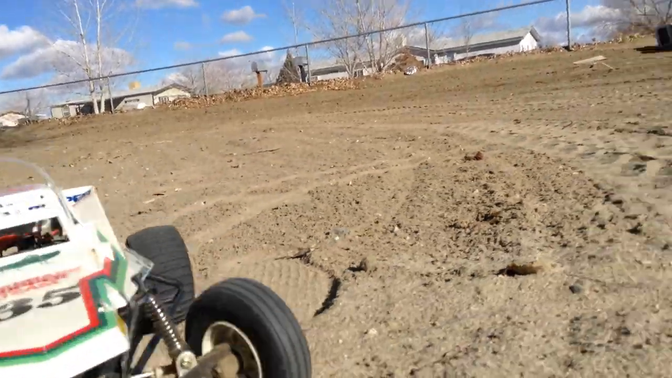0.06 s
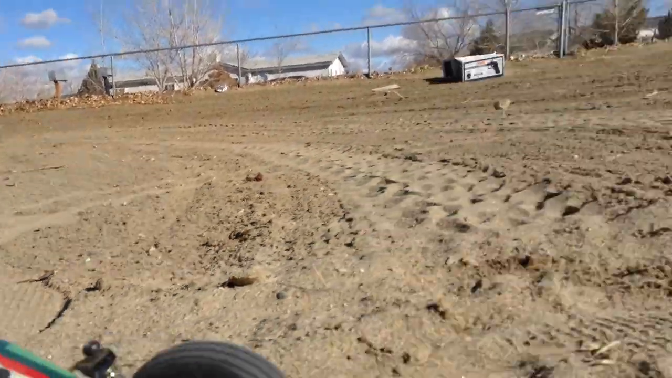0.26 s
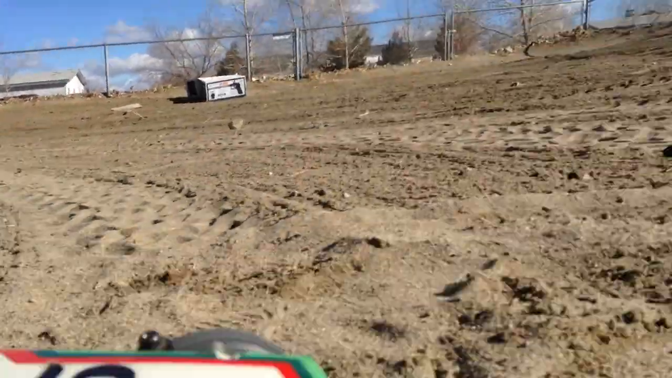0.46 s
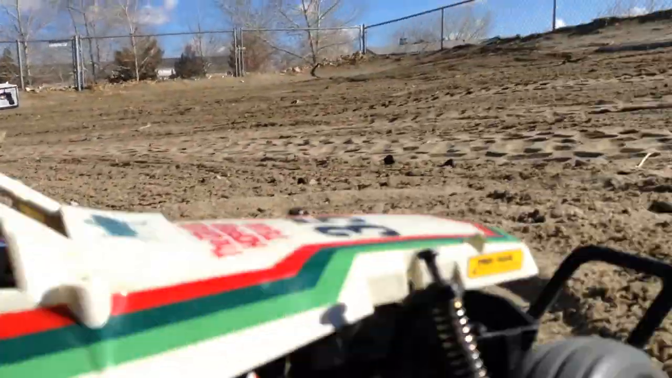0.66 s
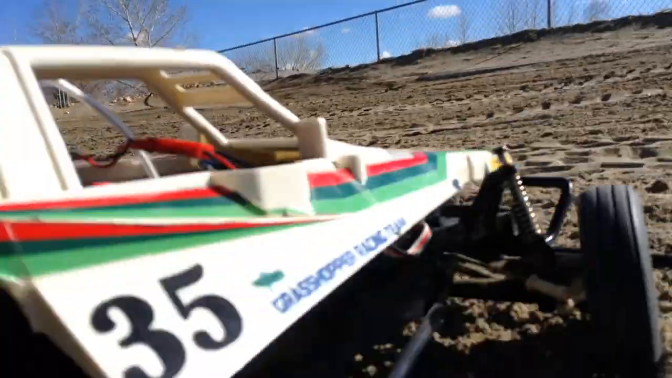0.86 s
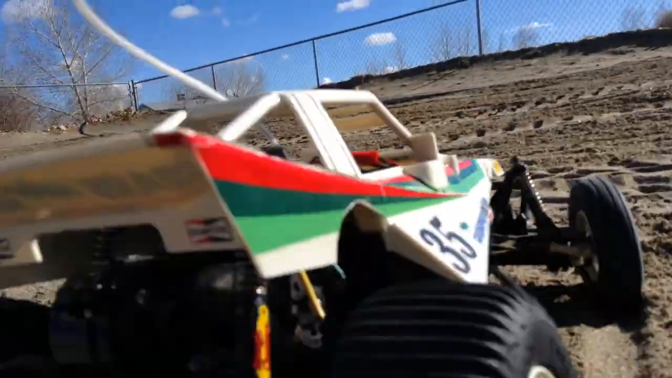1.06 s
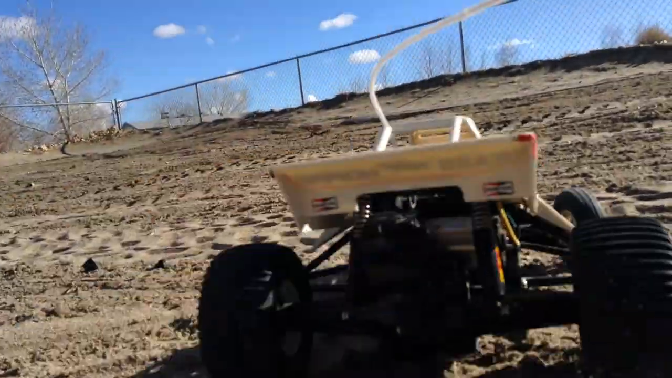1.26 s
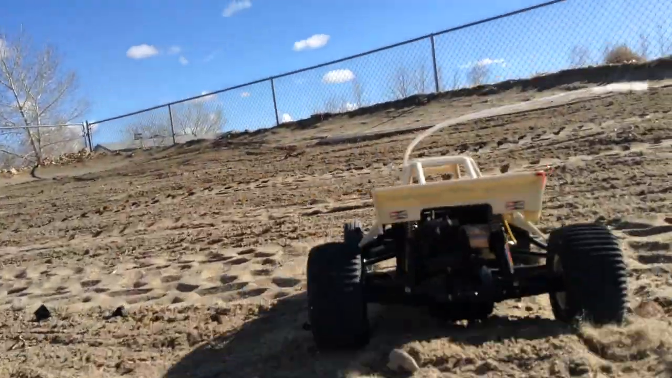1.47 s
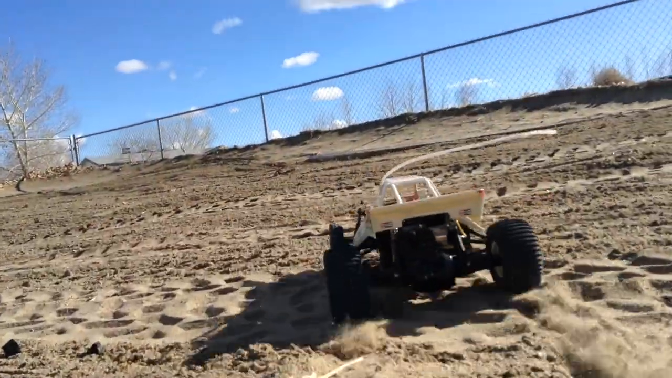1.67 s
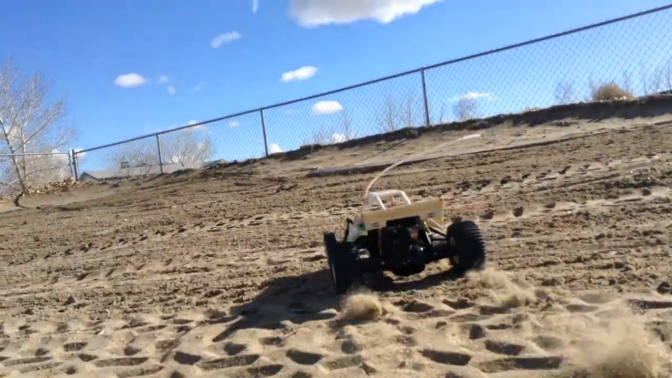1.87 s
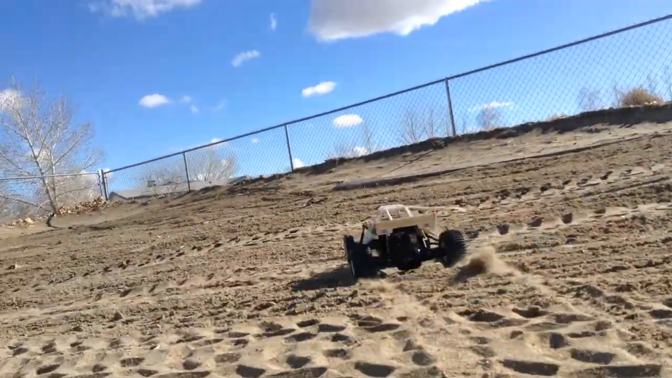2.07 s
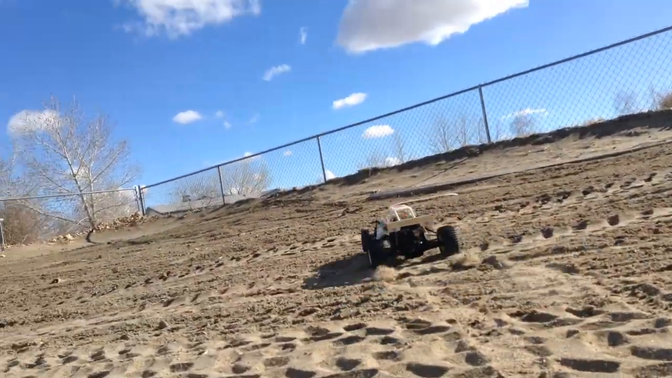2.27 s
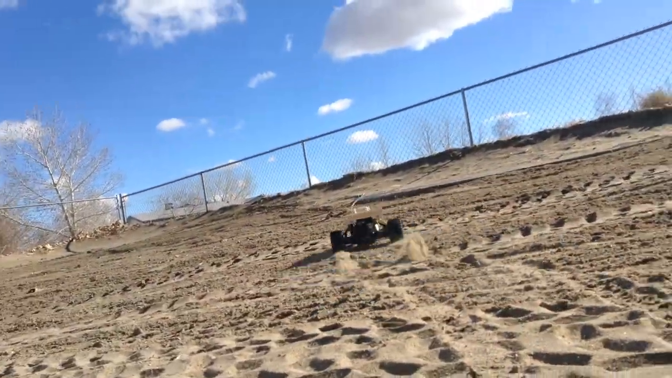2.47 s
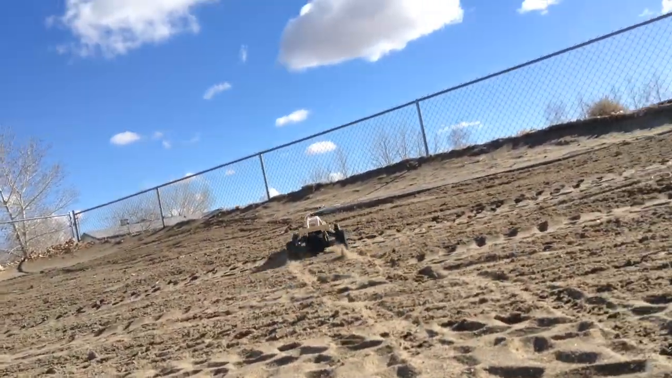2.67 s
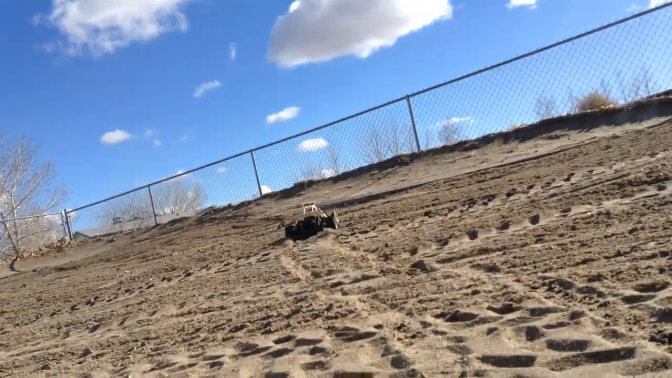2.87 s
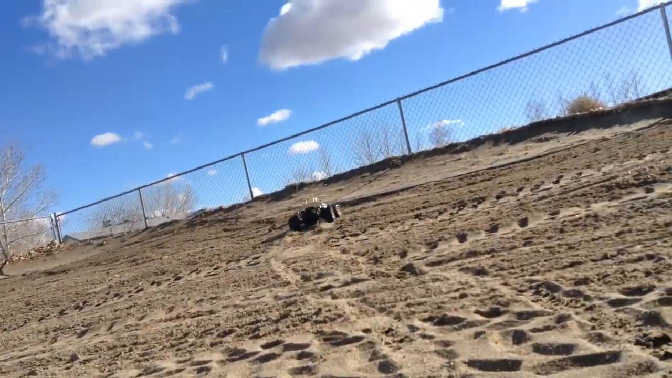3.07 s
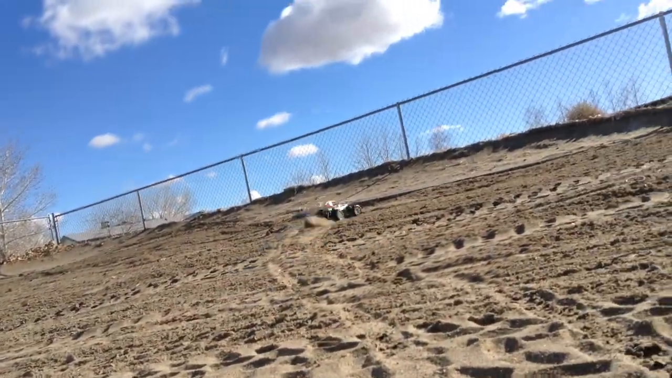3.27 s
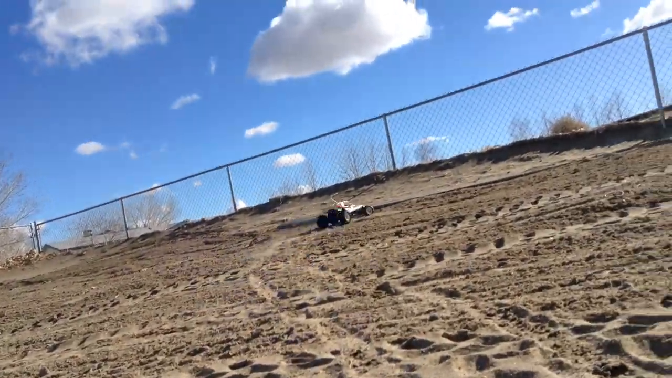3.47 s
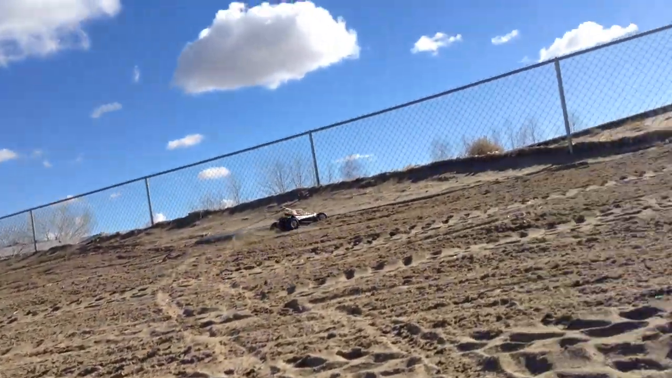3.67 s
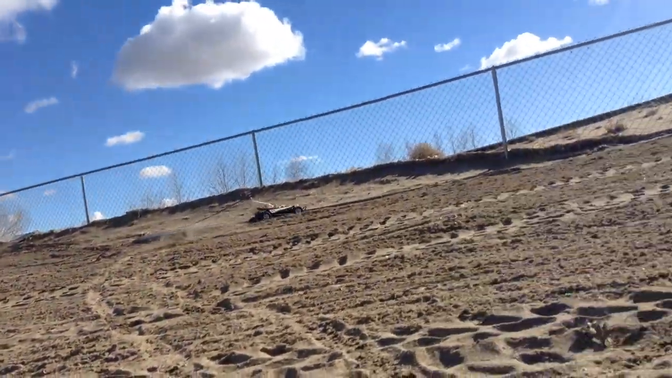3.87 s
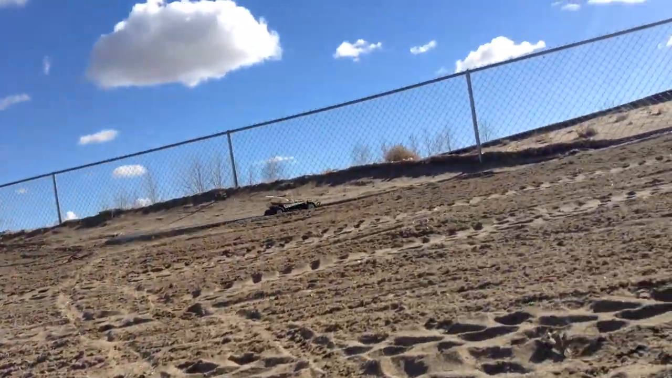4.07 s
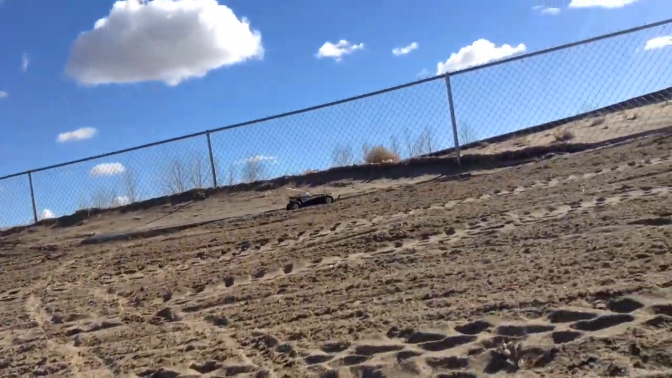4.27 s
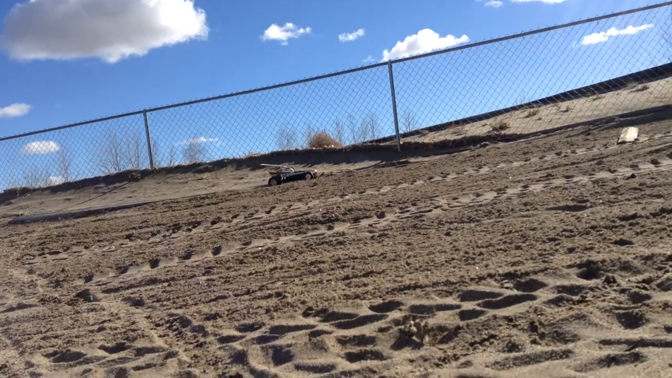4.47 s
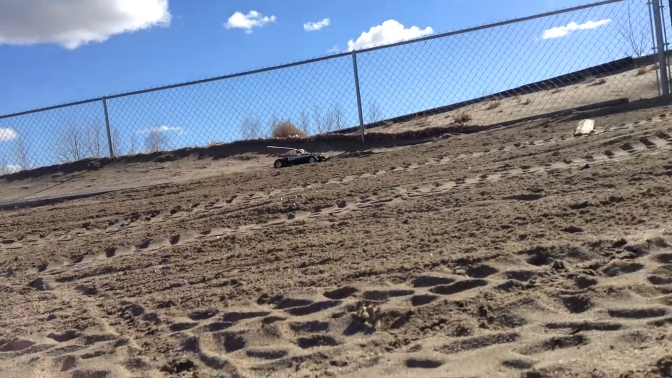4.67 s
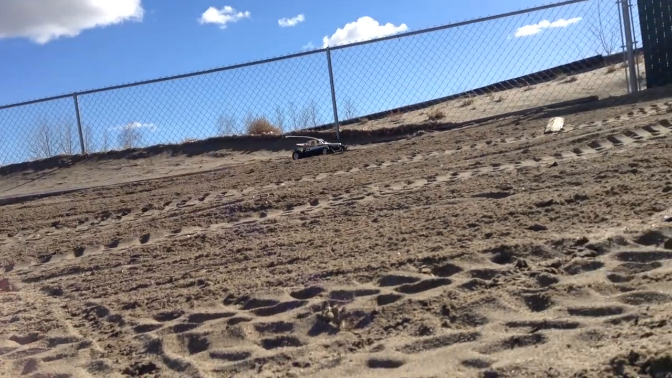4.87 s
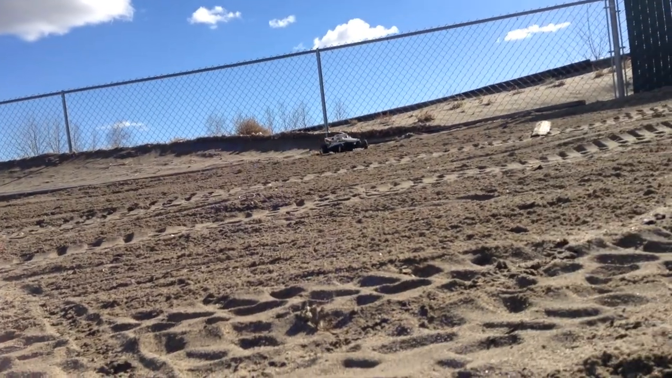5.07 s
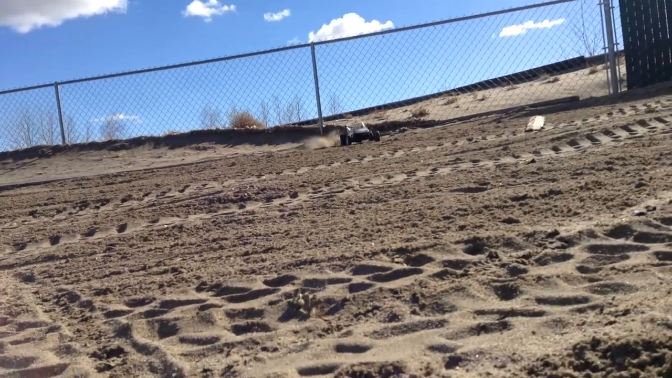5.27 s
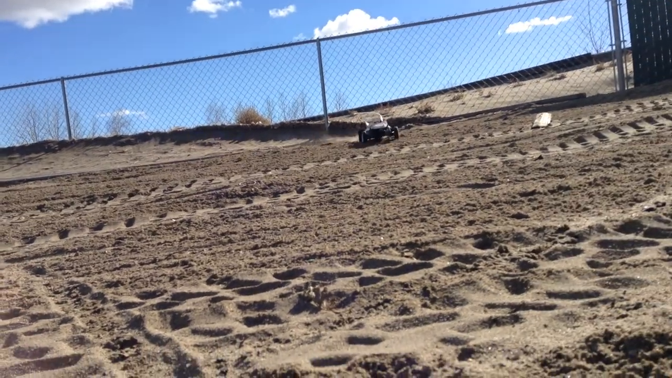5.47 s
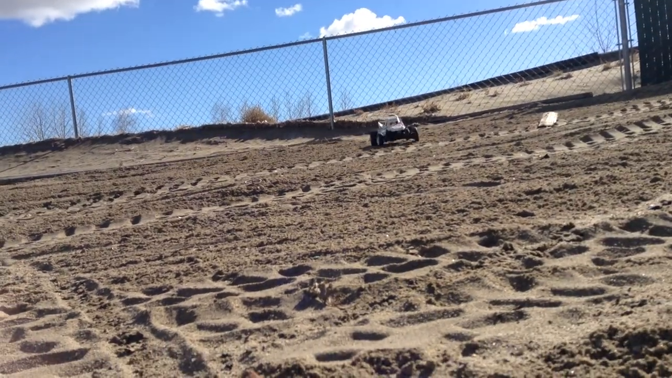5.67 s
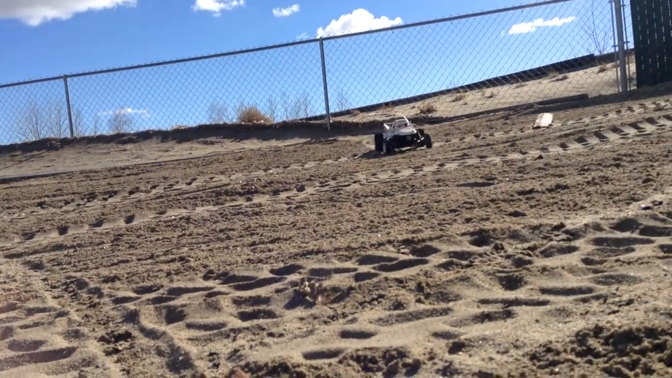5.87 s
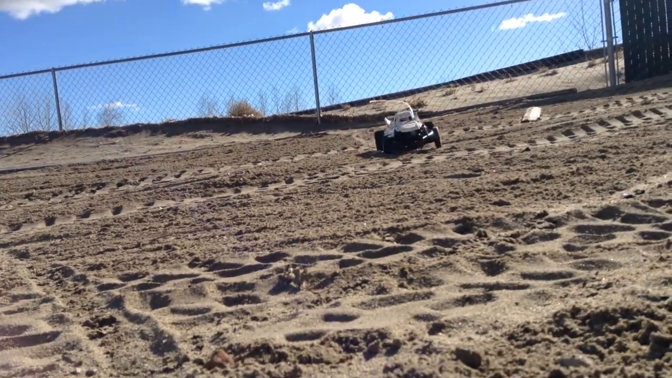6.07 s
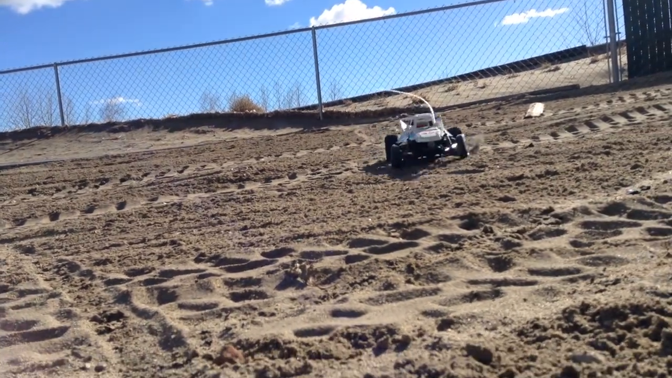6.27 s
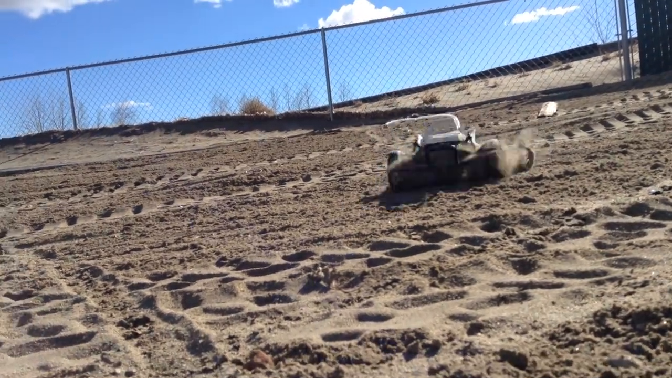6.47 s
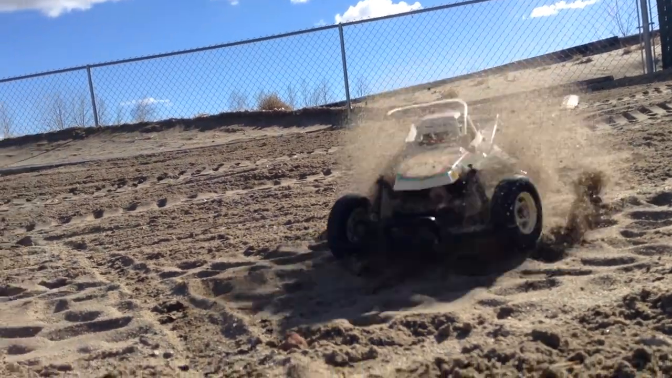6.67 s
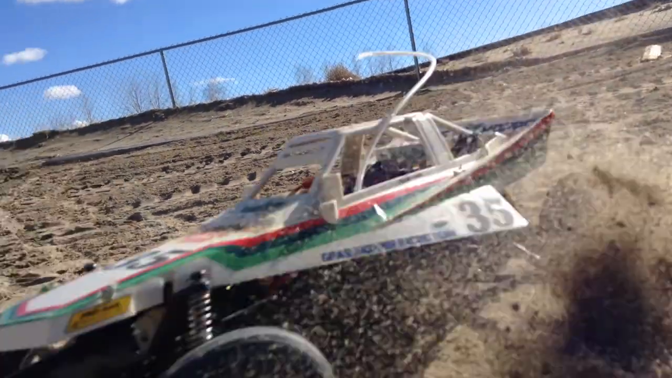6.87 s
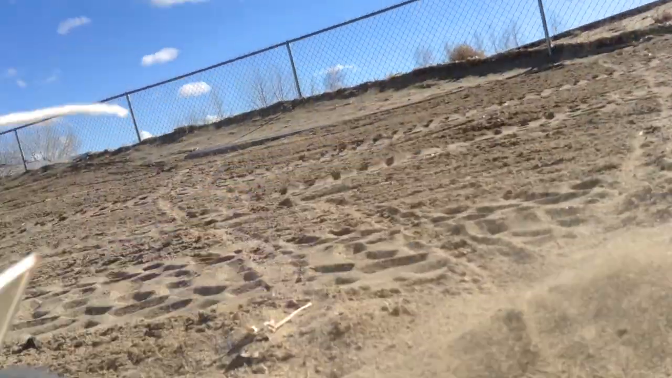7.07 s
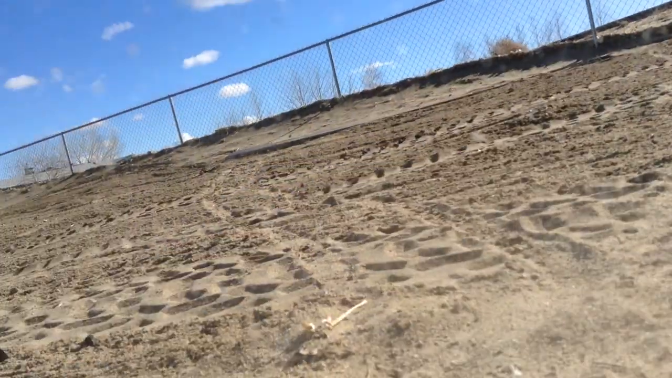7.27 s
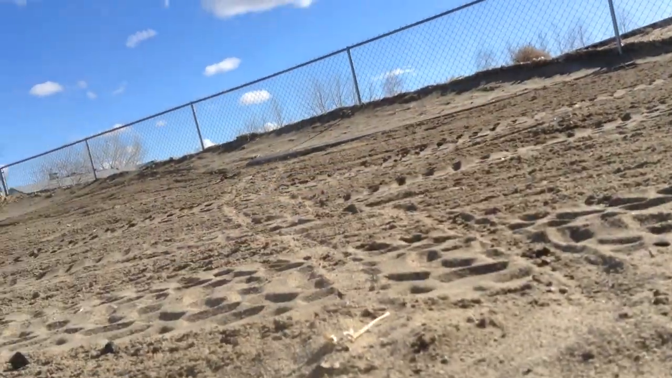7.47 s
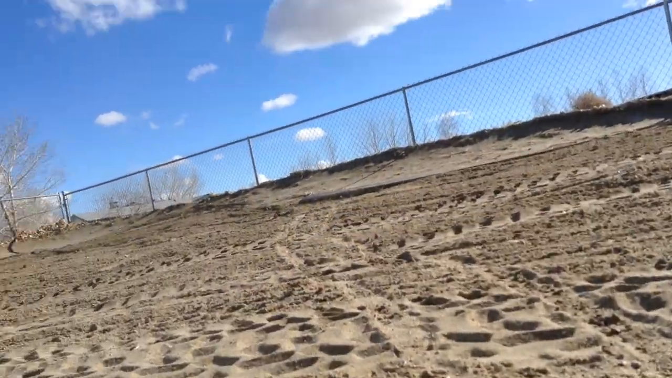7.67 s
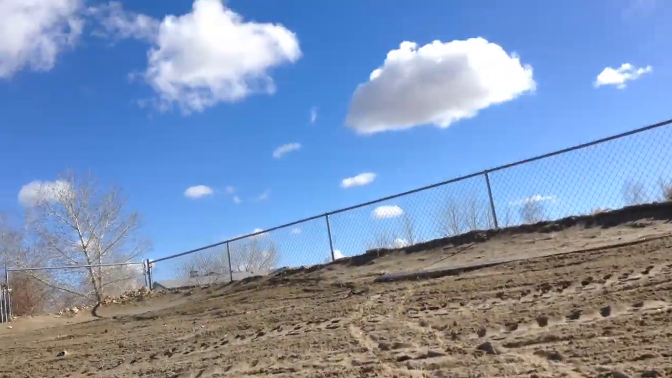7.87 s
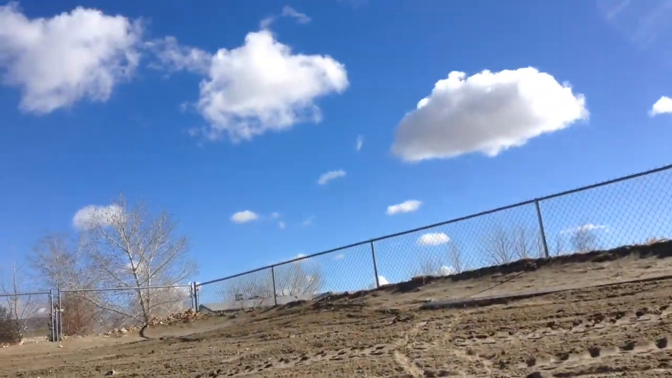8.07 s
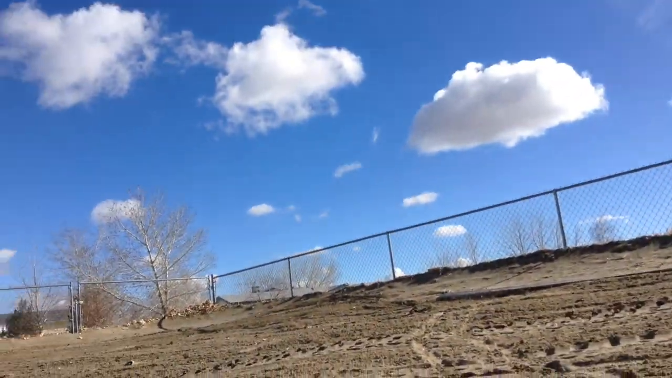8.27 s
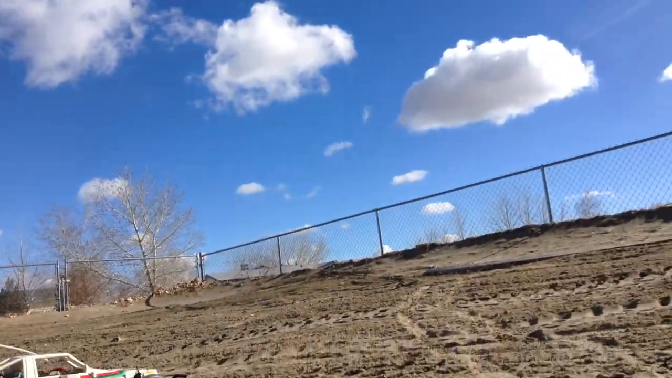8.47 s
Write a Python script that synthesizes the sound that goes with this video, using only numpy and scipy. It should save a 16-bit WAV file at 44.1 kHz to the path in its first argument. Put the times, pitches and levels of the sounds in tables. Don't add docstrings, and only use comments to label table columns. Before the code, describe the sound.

Open dirt ground, dry outdoor sound, small handheld microphone. From the start a toy electric buggy's plastic gears whine at medium level, rough and warbling as ruts and hops jerk its speed, with bright gritty hiss. It swells around 0.8-1.8 s in an uneven close pass, with hard little knocks near 1.05 and 1.6 and dull hollow thumps. At about 1.6 the pitch leaps up and the buggy drives off, fading steadily to 3 s. From 3.5 to about 5.8 it is a thin, faint, fluttering treble whirr, over barely audible wind and far traffic. It grows again from 6, rising in pitch, and bursts past loudest around 6.8-7.2, with a lumpy sand-skid roar, rattling clicks and thumps. By 7.75 it has dropped in level and pitch, and it whines on, rough and moderate, to the end at 8.5.

```python
import sys
import numpy as np
from scipy import signal
from scipy.fft import rfft, irfft
from scipy.io import wavfile
from scipy.ndimage import uniform_filter1d

SR = 44100
rng = np.random.default_rng(int(sys.argv[2]) if len(sys.argv) > 2 else 0)


def unload_wav(signal):
    wavfile.write(
        sys.argv[1],
        SR,
        np.round(np.clip(np.atleast_2d(signal).T, -1, 1) * 32767).astype(np.int16),
    )


def level_to_linear(level):
    exponent = np.asarray(level, float) / 20
    return 10 ** exponent


N = 375732
TIME_S = np.arange(N) / SR

# [t/s, f/Hz]
MESH_RATE = [(0.0, 864.3), (0.3, 874.5), (0.85, 740.3), (1.03, 743.1), (1.14, 904.6), (1.35, 1082),
             (1.52, 1078), (1.6, 1585), (2.0, 1703), (2.6, 1730), (3.3, 1892), (4.2, 1845), (5.2, 1764),
             (5.8, 1773), (6.5, 1980), (7.3, 2138), (7.8, 1679), (8.52, 1495)]
# [t/s, gearbox level/dB, share turned away/0-1, sand spray level/dB]
DRIVE = [(0.0, -29, 0, -18.5), (0.9, -20, 0.04, -12.5), (1.04, -22.5, 0, -14), (1.2, -13.5, 0.77, -18.5),
         (1.45, -21, 0.59, -9.5), (1.7, -13, 0.95, -11.5), (2.25, -24, 0.95, -7.5), (3.14, -30, 1.1, -6.5),
         (3.46, -38, .8, -9), (3.62, -34, 1, -6), (3.89, -38.5, 0.88, -3), (3.915, -44, 0.55, -12),
         (4.9, -41.5, 1, -13.5), (5.84, -40.5, 0.58, -6), (6.56, -26.5, 0.51, -11.5),
         (7.08, -10, 0.78, -14), (7.75, -26.5, 0.52, -13.5), (8.52, -29.5, 0.77, -15)]
# [t/s, whine above hiss level/dB, housing song level/dB]
GEAR_LOAD = [(0, -5.5, -4.5), (.85, -1, 0.5), (1.15, -2.5, 3.5), (1.5, -0.5, 7), (1.65, -0.5, 0),
             (3.4, 0, -2), (4.5, -1.5, -2.5), (5.8, 1.5, -5.5), (6.5, -1.5, -5), (7.5, -3, -1.5),
             (8.52, 1.5, -2)]
# [t/s, strength/1]
BACKLASH = [(0, .8), (.85, .6), (.92, .35), (1.5, .45), (1.65, .7), (3.4, .9), (3.55, 1.2), (4.5, 1),
            (5.8, 1), (6.4, 1.6), (7.5, 1.2), (8.15, 1.1), (8.3, .8), (8.52, .7)]
# [f/Hz, level/dB]
HOUSING_GAIN = [(150, -48), (550, -20), (850, -18.5), (1150, -20.5), (1400, -14), (1800, -6.5),
                (2250, -8.5), (2600, -13.5), (3200, -20.5), (4500, -8.5), (5700, -2), (6500, -0.5),
                (8000, -15), (15500, -33.5)]
SHAFT_DB = [-4, -11]
# [t/s, speed loss/%]
RUTS = [(0.012, 16.7), (0.166, 20), (0.361, 20), (0.519, 13.1), (0.934, 12.2), (0.967, 6), (1.034, 25.2),
        (1.253, 16.4), (1.918, 11.3), (2.063, 9.6), (2.79, 15.3), (2.875, 14.3), (3.937, 9.3),
        (4.326, 16.9), (4.416, 22), (4.532, 12), (4.783, 10.3), (5.168, 9.5), (5.613, 18.3), (5.831, 21.3),
        (6.048, 15.7), (6.114, 9), (6.609, 17), (6.956, 13.7), (7.222, 18.7), (7.256, 8.6), (7.379, 11),
        (7.818, 11.6), (7.944, 9.2), (8.233, 16)]
# [t/s, speed gain/%]
HOPS = [(0.112, 8), (0.263, 22.2), (0.461, 8.4), (0.784, 37), (0.81, 13.5), (0.846, 34.7), (1.105, 12),
        (1.307, 9.5), (1.385, 14), (1.58, 10.3), (1.802, 7.8), (1.838, 29.7), (1.968, 8.1), (2.361, 12.8),
        (2.45, 23.4), (2.638, 18.9), (2.941, 18), (3.191, 15.6), (3.306, 16), (3.827, 16.3), (3.869, 23),
        (5.292, 10), (5.685, 7.7), (5.933, 10.7), (6.354, 15.2), (6.727, 19.6), (7.166, 6.8), (7.437, 15.2),
        (8.353, 25.6), (8.439, 10.2)]
# [t/s, speed change/%]
STONES = [(0.085, 18.5), (0.603, -11), (0.637, 25), (0.697, 18.5), (1.714, -23), (2.099, 11), (2.185, 14.5),
          (2.229, -27.5), (2.255, -8), (2.289, -17.0), (2.536, 20), (2.901, 9), (3.053, -40.0),
          (3.436, -34), (3.462, -15.5), (3.494, -10), (3.52, -27), (3.793, 17.5), (4.099, -13.4),
          (4.125, -30.0), (4.871, -18.5), (5.432, -20), (6.324, 15), (6.453, 11.5), (6.529, 23.5),
          (6.557, 10.5), (7.034, -12.5), (7.627, -9), (7.784, -14.5), (8.104, 11)]
# [t/s, length/ms, gain/dB]
GRIPS = [(0.221, 27, 2.5), (0.271, 17, 5.3), (0.401, 10, 5.5), (0.635, 18.3, 3), (0.794, 15, 6),
         (1.058, 10, 7.5), (1.323, 10.2, 3.9), (1.976, 10.1, 4.6), (2.027, 9.2, 5.5), (2.351, 12.3, 7),
         (2.478, 32, 0.5), (3.129, 9.8, 9.5), (3.211, 18.7, 7.5), (3.592, 57, 3), (3.893, 17.6, 2.5),
         (4.085, 28, 5.5), (4.38, 32, 3.5), (6.385, 17.4, 1.5), (6.673, 10, 5), (6.882, 107, 3.5),
         (6.906, 7.2, 4), (7.012, 17, 2.5), (7.054, 10, 6.5), (7.21, 17.5, 5), (7.367, 18, 0.5),
         (7.465, 18, -1), (7.579, 61, 1.5), (7.716, 10.5, 4), (8.189, 18, 2.5), (8.361, 32, 2.5)]
# [t/s, length/ms, loss/dB]
SLACKS = [(0.363, 19, 3), (0.504, 21, 9.5), (0.735, 25, 8.5), (0.892, 27, 11), (0.926, 29, 6.5),
          (1.03, 23, 10), (1.135, 9.1, 10.5), (1.435, 21, 3.5), (1.56, 10, 5.0), (1.722, 21, 6.5),
          (1.792, 21, 7.5), (1.882, 19, 6.5), (2.081, 8, 3), (2.111, 7.9, 5.3), (2.215, 9.4, 8),
          (2.291, 10.7, 6), (2.434, 19.6, 3.5), (2.598, 32, 2.5), (2.72, 66, 4.5), (3.011, 10, 9),
          (3.049, 18, 8.5), (6.952, 10.3, 4.3), (7.248, 10, 5), (7.273, 10.6, 4), (7.501, 10, 4.5),
          (7.814, 18, 5.5), (7.846, 10, 1.5), (7.928, 25, 4.0), (8.241, 19, 5.4), (8.405, 10, 5)]
# [f/Hz, level/dB per Hz]
HISS_SPECTRUM = [(100, -42), (240, -33), (550, -21.5), (1100, -15.5), (1900, -10.5), (3000, -14),
                 (4500, -10), (6200, -2.5), (8000, -3), (11000, -16), (15500, -26.5)]
# [t/s, peak level/dB]
KNOCKS = [(0.859, -11), (1.0544, 0), (1.089, -5), (1.6, 0), (1.801, -5.5), (1.9708, -6), (2.0878, -15),
          (2.3015, -13), (2.321, -12.5), (2.3459, -33), (3.1271, -26), (3.5603, -39), (3.756, -37),
          (4.5056, -41), (4.9395, -31), (5.1397, -38), (6.2143, -21), (6.6712, -16), (6.854, -1),
          (6.9009, -3), (7.2802, -5), (7.856, -17), (8.1837, -27), (8.2214, -33), (8.3414, -17),
          (8.4119, -29)]
# [t/s, peak level/dB, f/Hz]
THUMPS = [(0.549, -31, 498), (0.794, -27, 600), (1.034, -30, 561), (1.079, -24.5, 469), (1.179, -37, 320),
          (1.589, -35, 385), (3.628, -50, 165), (6.703, -45, 328), (6.946, -25.5, 242.4), (7.004, -28, 570),
          (7.07, -25, 550), (7.118, -20.5, 566), (7.303, -26, 463), (7.648, -28, 510.5),
          (7.818, -30, 418.4), (8.218, -32.5, 605)]
# [t/s, length/ms, peak level/dB]
GUSTS = [(0.1, 150, -74), (0.58, 85, -66), (0.82, 130, -67), (1.07, 120, -58), (1.82, 103.6, -78),
         (3.0, 100, -83), (3.4, 141, -61), (3.66, 163, -68.5), (5.22, 119, -65), (5.6, 200, -76),
         (6.5, 100, -70), (6.76, 120, -60), (6.96, 59, -48), (7.48, 150, -61.5), (8.27, 79, -61.5),
         (8.52, 75, -59)]
# [f/Hz, level/dB per Hz]
TRAFFIC_SPECTRUM = [(30, -35), (100, -36), (190, 7.5), (400, -27), (600, -1.5), (1200, 1), (3000, -44)]

BUMP_MS, STONE_MS, REBOUND_SHARE, REBOUND_S = 26, 18, .6, .042
RIPPLE_PERCENT, RIPPLE_PER_S = 1.5, 20
FACING_TONE_DB, TURNED_TONE_DB = 2.5, -12.5
FACING_DRONE_DB, TURNED_DRONE_DB = -10, -25
DRONE_CARRY = 0.28
SHAFT_BLUR_RAD = .9
LIFT_DB, LIFT_S = 5, .01
SKID_S, SKID_MS, SKID_DB = 6.86, 212, -33.5
CALM_DB, TRAFFIC_DB = -89.5, -58


def in_time(rows):
    s, *columns = np.transpose(rows)
    return [np.interp(TIME_S, s, c) for c in columns]


def at_hz(points, hz):
    table_hz, table_db = np.array(points).T
    return np.interp(np.log(hz), np.log(table_hz), table_db)


def humps(rows):
    coarse_s = TIME_S[::32]
    total = sum(size * np.exp(-.5 * ((coarse_s - s) * 2 / (ms * 1e-3)) ** 2) for s, ms, size in rows)
    return np.interp(TIME_S, coarse_s, total)


def drift(rate_hz):
    r = np.exp(-32 * np.pi * rate_hz / SR)
    noise = rng.standard_normal(N // 16 + 2002)
    slow = signal.lfilter([1], [1, -2 * r, r * r], noise)[2000:]
    return np.interp(np.arange(N) / 16, np.arange(len(slow)), slow / slow.std())


def band(x, low_hz, high_hz):
    return signal.sosfilt(signal.butter(2, [low_hz, high_hz], "band", fs=SR, output="sos"), x)


def decay(x, fall_s):
    return signal.lfilter([1], [1, -np.exp(-1 / (fall_s * SR))], x)


def strikes(rows):
    out = np.full(N, 1e-18)
    for s, peak_db, *_ in rows:
        out[min(round(s * SR), N - 1)] = level_to_linear(peak_db)
    return out


def whine(mesh_hz, turns, body, chatter, song_db, flicker_db, gap_db):
    slack_db = -gap_db * chatter * np.clip(drift(110.0) + 0.061, 0, 2)
    orders = [(1 / 3, SHAFT_DB[0]), (2 / 3, SHAFT_DB[1])] + [(k, 0) for k in range(1, 15)]
    out = 0
    for order, order_db in orders:
        hz = (order * mesh_hz)[::16]
        sings_db = song_db[::16] * np.exp(-(np.log(hz / 2000) / .22) ** 2)
        gain_db = at_hz(HOUSING_GAIN, hz) + sings_db + radiation(hz, *body[:, ::16])
        gain_db = gain_db - 99 * (hz > 16000)
        gain_db = np.interp(TIME_S, TIME_S[::16], gain_db) + order_db
        gain_db = gain_db + np.clip(order / 3, .6, 1) * slack_db + flicker_db * drift(75.0)
        blur_rad = .4 * chatter * np.sqrt(order) if order >= 1 else SHAFT_BLUR_RAD
        phase_rad = 2 * np.pi * order * turns + blur_rad * drift(150.0)
        out = out + level_to_linear(gain_db) * np.sin(phase_rad)
    return out


def ground():
    bumps = HOPS + [(s, -loss) for s, loss in RUTS]
    swings = [(s, BUMP_MS, size) for s, size in bumps]
    rebounds = [(s + REBOUND_S, BUMP_MS, -REBOUND_SHARE * size) for s, size in bumps]
    kicks = [(s, STONE_MS, size) for s, size in STONES]
    return (humps(swings + rebounds + kicks) + RIPPLE_PERCENT * drift(RIPPLE_PER_S)) / 100


def slaps(per_s):
    hits = (rng.random(N) < per_s / SR) * rng.uniform(.3, 1, N)
    tail = np.tanh(uniform_filter1d(decay(hits, .008), size=60))
    return tail - tail.mean()


def pressure():
    return 0.95 * humps(GRIPS + [(s, ms, -db) for s, ms, db in SLACKS]) + lifts()


def lifts():
    ahead = strikes([(s, 0) for s, _ in KNOCKS])[::-1]
    return -LIFT_DB * decay(ahead, LIFT_S)[::-1]


def heading():
    level_db, turned, spray_db = in_time(DRIVE)
    tone_db = FACING_TONE_DB + turned * (TURNED_TONE_DB - FACING_TONE_DB)
    drone_db = FACING_DRONE_DB + turned * (TURNED_DRONE_DB - FACING_DRONE_DB)
    drone_db = drone_db + DRONE_CARRY * (-28.5 - level_db)
    return [level_db, tone_db, drone_db, spray_db]


def radiation(hz, level_db, tone_db, drone_db, spray_db, bite_db):
    octave = np.log2(hz / 1000)
    low = np.clip((.15 - octave) / .3, 0, 1)
    high = np.clip((octave - 1.4) / .9, 0, 1)
    top = np.clip((octave - 2.9) / .6, 0, 1)
    turned_db = low * (drone_db + 24) + (1 - low - high) * (tone_db + 9) + top * (spray_db + 15)
    return level_db + turned_db + bite_db * (.55 - 0.34 * low + 0.6 * high)


def hiss(turns, body, patchy_db, gate):
    white = rng.standard_normal((2, N)) * (1 + gate * np.cos(2 * np.pi * turns))
    together = drift(50.0)
    edges_hz = 100 * 2 ** np.arange(0, 7.6, .4)
    out = 0
    for k, (low_hz, high_hz) in enumerate(zip(edges_hz, edges_hz[1:])):
        hz = np.sqrt(low_hz * high_hz)
        patches = np.clip(hz / 4000, .2, 1.5) * together + drift(25.0)
        gain_db = at_hz(HISS_SPECTRUM, hz) + radiation(hz, *body) + patchy_db * patches
        out = out + level_to_linear(gain_db) * band(white[k % 2], low_hz, high_hz)
    return out


def knocks():
    fade = decay(strikes(KNOCKS), 0.0022)
    return level_to_linear(-4.5) * band(fade * rng.standard_normal(N), 2500, 10700)


def thumps():
    out, puff_s = np.zeros(N), TIME_S[:SR // 10]
    puffs = rng.standard_normal((len(THUMPS), len(puff_s))) * np.exp(-puff_s / .009)
    for (s, peak_db, hz), puff in zip(THUMPS, puffs):
        ring = band(puff, 0.75 * hz, 1.35 * hz)
        i = round(s * SR)
        out[i:i + len(ring)] += level_to_linear(peak_db + 1.0) * ring[:N - i] / abs(ring).max()
    return out


def skid():
    roar = band(rng.standard_normal(N), 539, 3140)
    return level_to_linear(SKID_DB + 3.1 * drift(38.0)) * humps([(SKID_S, SKID_MS, 1)]) * roar / roar.std()


def wind():
    white = rng.standard_normal(N)
    rumble = band(white, 119, 213) + level_to_linear(-12) * band(white, 30, 96)
    force = level_to_linear(CALM_DB) + humps([(s, ms, level_to_linear(db)) for s, ms, db in GUSTS])
    return force * level_to_linear(2.0 + 3.5 * drift(25.0)) * rumble / rumble.std()


def traffic():
    hz = np.arange(N // 2 + 1) * SR / N + 1
    murmur = irfft(rfft(rng.standard_normal(N)) * level_to_linear(at_hz(TRAFFIC_SPECTRUM, hz)), N)
    return level_to_linear(TRAFFIC_DB - 6) * murmur / murmur.std()


def scene():
    chatter, = in_time(BACKLASH)
    clarity_db, song_db = in_time(GEAR_LOAD)
    jolts = ground()
    slap = chatter * slaps(per_s=45.0)
    mesh_hz = in_time(MESH_RATE)[0] * np.exp(jolts + .1 * slap + .018 * chatter * drift(50.0))
    turns = np.cumsum(mesh_hz) / SR
    braking = np.clip(-uniform_filter1d(np.gradient(jolts) * SR, size=300), -12, 12)
    body = np.array(heading() + [pressure() + 2.5 * slap])

    tones = whine(mesh_hz, turns, body, chatter, song_db, flicker_db=4.0, gap_db=7.5)
    buggy = level_to_linear(clarity_db + 0.16 * braking + 0.5) * tones
    buggy = buggy + level_to_linear(1.5) * hiss(turns, body, patchy_db=2.0, gate=0.6)
    buggy = buggy + knocks() + thumps() + skid()
    buggy = signal.sosfilt(signal.butter(3, 130, "high", fs=SR, output="sos"), buggy)
    echo = np.roll(signal.lfilter([.5, .5], [1], buggy), round(0.0036 * SR))
    return (buggy + level_to_linear(-17.5) * echo + wind() + traffic())[None]


def roll_off(x):
    return signal.sosfilt(signal.butter(12, 15720, fs=SR, output="sos"), x)


def record(dry):
    mix = .8 * np.tanh(dry / .8)
    mix = signal.sosfilt(signal.butter(3, 75, "high", fs=SR, output="sos"), mix)
    mix = signal.sosfilt(signal.cheby2(12, 50, 16000, fs=SR, output="sos"), mix)
    return roll_off(mix)


dry = scene()
out = record(dry)
unload_wav(out)
```